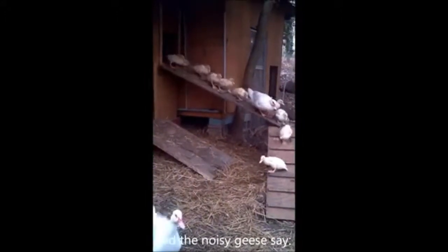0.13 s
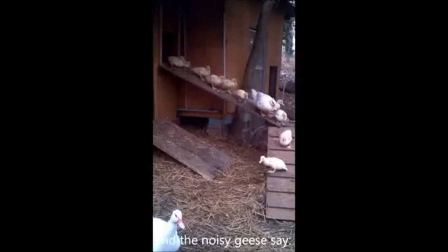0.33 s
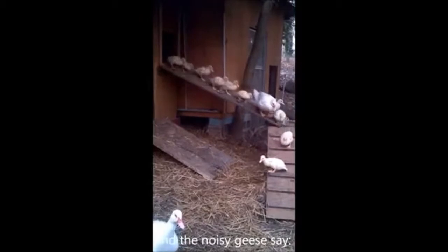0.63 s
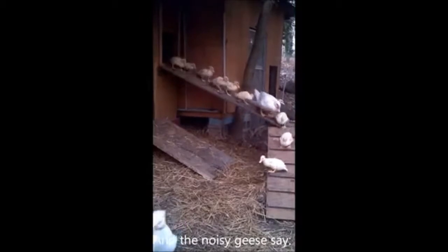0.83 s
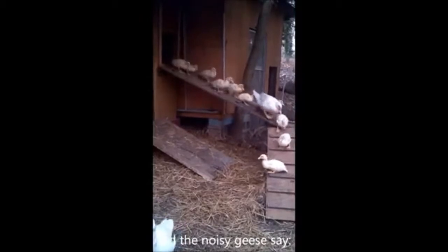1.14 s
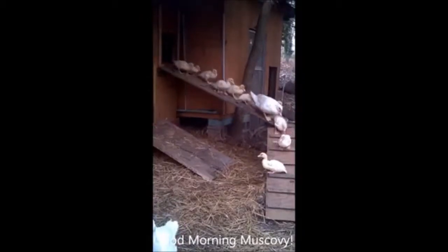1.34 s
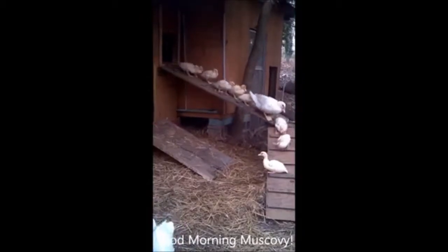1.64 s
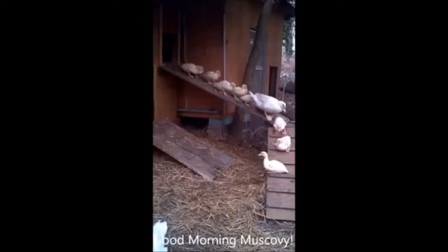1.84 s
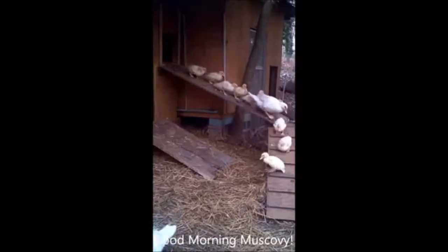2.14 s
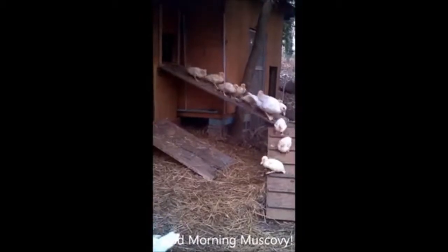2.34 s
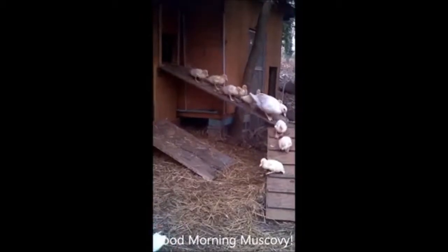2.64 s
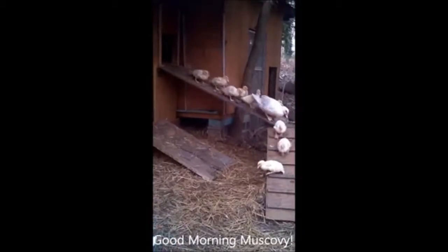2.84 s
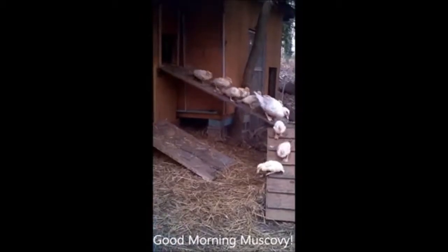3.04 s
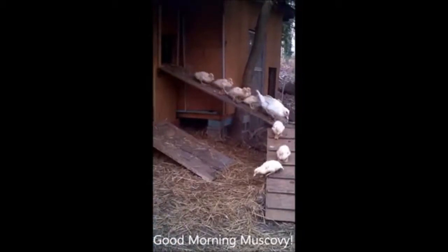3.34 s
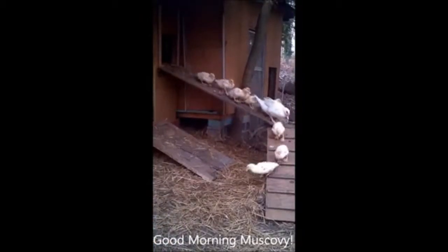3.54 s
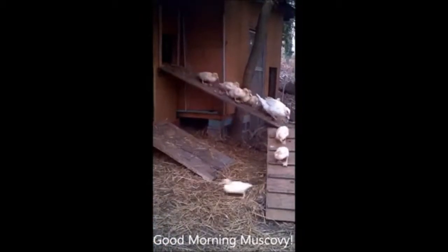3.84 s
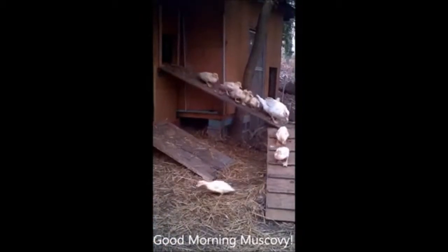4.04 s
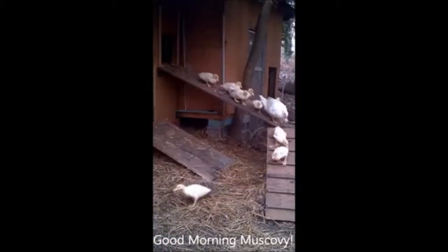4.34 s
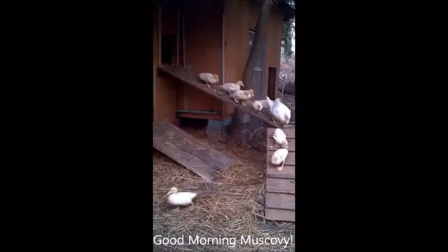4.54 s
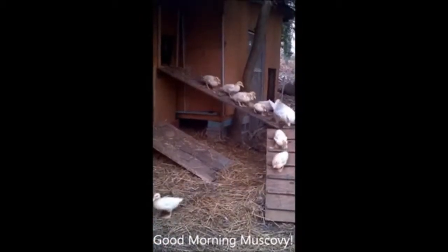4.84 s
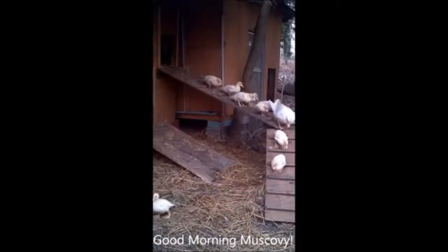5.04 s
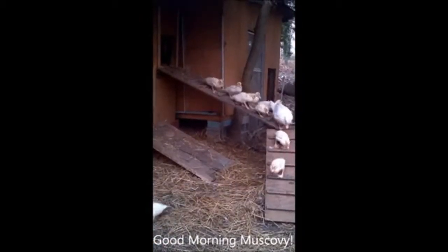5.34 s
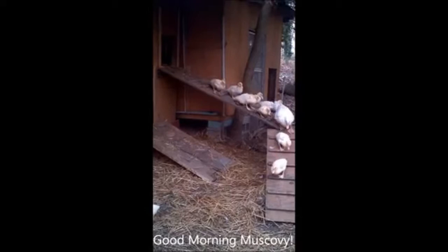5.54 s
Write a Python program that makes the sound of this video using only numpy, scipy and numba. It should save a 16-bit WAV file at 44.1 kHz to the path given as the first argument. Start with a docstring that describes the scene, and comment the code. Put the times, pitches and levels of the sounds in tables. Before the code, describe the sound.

Near geese honk hoarsely in one long blaring bout beside a wooden coop, then after a quiet lull with a distant rooster, honk again.

```python
"""Hushed yard air and a faint knock on wood come first, then geese honk in two long bouts beside a wooden coop.
Each goose is a train of membrane pulses shaped by throat, windpipe and beak; calls turn from hoarse to clear.
A second bird joins in. In the lull a far rooster's crow sinks away as two fluttering tones,
ducks cluck softly in short sliding notes, and feet rustle and snap straw in small bursts of noise."""
import sys
import numpy as np
from scipy import signal
from scipy.fft import rfft, irfft, next_fast_len
from scipy.io import wavfile
from scipy.ndimage import uniform_filter1d, map_coordinates
from numba import njit

SR = 44100
rng = np.random.default_rng(int(sys.argv[2]) if len(sys.argv) > 2 else 0)


def generate_wav(sig):
    """Save sig (samples, or channels by samples) to the path in sys.argv[1] as 16-bit PCM at SR."""
    pcm = np.round(np.clip(np.atleast_2d(sig).T, -1, 1) * 32767).astype(np.int16)
    wavfile.write(sys.argv[1], SR, pcm)


N = 250929
TIME = np.arange(N) / SR


def amp(db):
    """Turn decibels into a gain."""
    return 10 ** (np.asarray(db) / 20)


def unit(x):
    """Scale to an average (rms) level of 1."""
    return x / np.sqrt(np.mean(x ** 2) + 1e-20)


def steady(x):
    """Even out the loudness: hold the short-term rms near 1."""
    power = uniform_filter1d(uniform_filter1d(x ** 2, size=1200), size=1200)
    return x / np.sqrt(np.abs(power) + 1e-20)


def smooth(x, size=700):
    """Running mean over size samples, because nothing in a throat jumps."""
    return np.array(uniform_filter1d(np.asarray(x, float), size=size))


def gate(start, end):
    """1 from start to end, with soft edges."""
    return np.sqrt(np.abs(smooth((TIME >= start) & (TIME < end))))


def along(points, hz):
    """Read a value between (frequency, value) points on a log frequency axis."""
    f, v = np.transpose(points)
    return np.interp(np.log(hz + 1), np.log(f + 1), v)


def curves(rows):
    """One value per sample for each column after the time."""
    s, *cols = np.transpose(rows)
    return [np.interp(TIME, s, c) for c in cols]


def wobble(rate):
    """A smooth random curve with rate knots a second."""
    return map_coordinates(rng.standard_normal(int(N * rate / SR) + 4), [TIME * rate])


def filtered(x, response):
    """Multiply the spectrum of x by a complex response of frequency."""
    m = next_fast_len(N + 8192)
    return irfft(rfft(x, m) * response(np.fft.rfftfreq(m, 1 / SR)), m)[..., :N]


def keep_below(x, corner_hz, order):
    """Keep what lies below a corner frequency."""
    return filtered(x, lambda hz: 1 / (1 + (hz / corner_hz) ** order))


def keep_above(x, corner_hz, order):
    """Keep what lies above a corner frequency."""
    return filtered(x, lambda hz: 1 - 1 / (1 + (hz / corner_hz) ** order))


def coloured(x, points, size=4096):
    """Filter with the gain of (frequency [Hz], level [dB]) points, never sounding ahead of its input."""
    cepstrum = irfft(np.log(amp(along(points, np.fft.rfftfreq(size, 1 / SR)))))
    # folding the cepstrum onto its first half makes the filter causal
    cepstrum[1:size // 2] *= 2
    cepstrum[size // 2 + 1:] = 0
    return signal.oaconvolve(x, irfft(np.exp(rfft(cepstrum))))[:N]


def pair(x, lag=15 / SR):
    """Two channels: alike in the bass; higher up the right one is late (lag in s) and inverted."""
    apart = lambda hz: np.clip((hz - 1650) / 550, 0, 1)
    turn = lambda hz: apart(hz) * (2 * np.pi * hz * lag - np.pi) / 2
    sides = np.array([[1], [-1]])
    return filtered(x, lambda hz: np.exp(1j * turn(hz) * sides)) * amp([[-.3], [.3]])


# colour of the yard air: (frequency [Hz], level [dB])
AIR_COLOUR = [(25, -35), (70, -8.5), (130, -4), (500, -6), (850, -4), (1600, -7.5), (2200, -12.5),
              (3200, -19.5), (5000, -20.5), (15000, -65)]


def air(level_db=-60, rumble_db=-71):
    """Soft yard noise, over a low rumble that differs from side to side."""
    hush = amp(level_db + wobble(10.0)) * unit(coloured(rng.standard_normal(N), AIR_COLOUR))
    rumble_colour = [(25, -39.0), (60, -16.0), (130, -6.0), (400, -6.0), (1500, -64.0)]
    rumble = filtered(rng.standard_normal((2, N)), lambda hz: amp(along(rumble_colour, hz)))
    return pair(hush) + amp(rumble_db) * unit(rumble)


# colour of rubbed or snapped straw: (frequency [Hz], level [dB])
STRAW_COLOUR = [(1500, -50), (3500, -13.5), (5300, -17.5), (7500, -2.5), (9300, -2), (15000, -9.5)]
# steps in the straw: (time [s], half length [s], level [dB])
STEPS_IN_STRAW = [(2.442, 0.026, -54), (2.846, 0.15, -58.5), (3.233, 0.063, -59), (3.795, 0.057, -51),
                  (3.948, 0.029, -51.5), (4.048, 0.021, -49.5), (4.189, 0.013, -51), (4.356, 0.1, -55.5)]


def straw(stir_db=-65, grain_db=1.5):
    """Stalks rub under webbed feet in dense tiny grains: each step swells and fades over a constant stir."""
    power = amp(stir_db) ** 2
    for s, length, db in STEPS_IN_STRAW:
        swell = np.exp(-((TIME - s) / length) ** 2 / 2)
        power = power + (amp(db) * swell) ** 2
    grains = rng.standard_normal(N) * amp(grain_db * wobble(600))
    return np.sqrt(power) * unit(coloured(grains, STRAW_COLOUR))


def bursts(events, colour, t60):
    """Each contact is noise in the colour of what is struck, dying by 60 dB in t60 seconds."""
    envelope = sum(amp(db - 60 * np.abs(TIME - s) / t60) * (TIME >= s) for s, db in events)
    return envelope * unit(coloured(rng.standard_normal(N), colour))


# colour of knocked wood: (frequency [Hz], level [dB])
WOOD_COLOUR = [(200, -26), (800, -2), (1300, 4.5), (1750, 5.5), (2100, -23), (2500, -6), (4000, -70),
               (12000, -36)]
# knocks on the ramp: (time [s], level before the added gain [dB])
RAMP_KNOCKS = [(0.087, -61.5), (3.163, -46.5), (4.078, -59)]


def ramp_knocks():
    """Wood rings for about a tenth of a second after each knock."""
    return amp(6.0) * bursts(RAMP_KNOCKS, WOOD_COLOUR, t60=0.12)


# shape of the pitch arch before and after its crest
RISE_POWER, SAG_POWER = 2.05, 1.7


def arch(start, crest, end, first, top, last):
    """A value that climbs, levels out at the crest and then sags."""
    before = np.clip((crest - TIME) / (crest - start), 0, 1)
    after = np.clip((TIME - crest) / (end - crest), 0, 1)
    return top + (first - top) * before ** RISE_POWER + (last - top) * after ** SAG_POWER


# roughness from 0 (clear) towards 1 (all breath), and how fast each part comes or goes
HOARSE_ROUGH, ONSET_ROUGH, BREAK_ROUGH = .53, .3, .36
ONSET_S, CLEARING_S, BREAK_S = .1, .04, .12


def hoarseness(start, clears, clear_rough, breaking):
    """A call starts hoarse, locks into a clear tone and roughens again as it breaks off."""
    hoarse = HOARSE_ROUGH + ONSET_ROUGH * np.exp(-np.abs(TIME - start) / ONSET_S)
    locked = (1 + np.tanh((TIME - clears) / CLEARING_S)) / 2
    clear = clear_rough + BREAK_ROUGH * breaking ** 2
    return smooth(hoarse * (1 - locked) + locked * clear)


def syrinx(pitch_hz, rough, scatter=0.053, uneven_db=4, hiss=1.0, count=90):
    """Membrane pulses and their phase; roughness scatters their times and sizes and adds puffs of air."""
    phase = 2 * np.pi * np.cumsum(pitch_hz) / SR
    late = phase + 2 * np.pi * scatter * rough * wobble(130)
    # a sum of count equal harmonics makes one sharp pulse per cycle
    pulses = unit(np.sin((count + .5) * late) / (np.sin(late / 2) + 1e-12) - 1)
    pulses = pulses * amp(uneven_db * rough * wobble(90))
    puffs = unit(rng.standard_normal(N) * (1 + np.cos(phase)) ** 2)
    return np.sqrt(np.clip(1 - rough ** 2, 0, 1)) * pulses + hiss * rough * puffs, phase


# early echoes from coop wall, ground and ramp: (delay [s], level [dB])
EARLY_ECHOES = [(.0043, -16), (.0097, -14), (.0171, -15)]


def windpipe_and_walls(x, spread=4e-6):
    """The long windpipe delays higher partials (spread in s per Hz), softening pulses; the coop adds echoes."""
    def response(hz):
        echoes = 1 + sum(amp(db) * np.exp(-2j * np.pi * hz * delay) for delay, db in EARLY_ECHOES)
        return np.exp(-1j * np.pi * spread * hz ** 2) * echoes
    return filtered(x, response)


@njit
def resonance(x, centre, width):
    """A moving band-pass of gain 1; centre and width in radians a sample."""
    out, low, band = np.zeros(len(x)), 0.0, 0.0
    for i in range(len(x)):
        low += centre[i] * band
        band += width * (x[i] - band) - centre[i] * low
        out[i] = band
    return out


def ringing(x, centre_hz, width_hz):
    """What a moving resonance picks out of x."""
    return resonance(x, 2 * np.pi * centre_hz / SR, 2 * np.pi * width_hz / SR)


# colour of the voice's bright rasp: (frequency [Hz], level [dB])
RASP_COLOUR = [(1700, -22.5), (2050, -2.5), (2300, 2.5), (2770, 7), (2950, -3.5), (3250, 3.5), (3850, -1.5),
               (4600, -5.5), (5800, -12.5), (7600, -3), (11200, -16.5), (15000, -21)]
# bright upper resonance, moving with the beak's opening: (time [s], frequency [Hz])
GAPE_PATH = [(.15, 2210), (.44, 2460), (.66, 3020), (1.26, 2680), (1.58, 2810), (1.68, 2623), (2.08, 2920),
             (2.27, 2670), (4.59, 2406), (4.83, 2630), (5.5, 2722)]
GAPE_WIDTH_HZ, GAPE_GAIN, GAPE_WANDER = 217, 3.85, .07
OVERTONE_RATIO, OVERTONE_GAIN = 1.536, 0.93


def rasp(pitch_hz, rough, treble_db):
    """The membranes' sharp edge, smeared by close boards and coloured by two restless upper resonances."""
    edge = syrinx(pitch_hz, rough, scatter=.028, hiss=.5)[0] + .075 * rng.standard_normal(N)
    # three short paths change in strength as the head turns
    paths = rng.standard_normal((3, SR // 10)) * amp(-60 * TIME[:SR // 10] / 0.094)
    smeared = sum(amp(14.6 * wobble(9)) * signal.oaconvolve(edge, path)[:N] for path in paths)
    direct = .25 * unit(windpipe_and_walls(edge, spread=1e-6))
    bright = coloured(direct + steady(smeared), RASP_COLOUR)
    gape_hz, = curves(GAPE_PATH)
    peaks = 0
    for ratio, gain in [(1, GAPE_GAIN), (OVERTONE_RATIO, OVERTONE_GAIN)]:
        centre_hz = ratio * gape_hz * (1 + GAPE_WANDER * wobble(10))
        peaks = peaks + gain * ringing(bright, centre_hz, GAPE_WIDTH_HZ)
    sound = steady(bright + peaks)
    return sound + (amp(treble_db) - 1) * keep_above(sound, 6000, 12)


# throat shapes of the near geese's calls: the first goose's opening, another goose's moan, then the first
# goose's blare and both calls of its second bout: (frequency [Hz], level [dB])
OPENING_THROAT = [(300, -30), (430, -25), (600, 1), (680, -14.5), (750, -2.5), (860, 1.5), (1050, 7),
                  (1220, 8), (1370, 7.5), (1520, 10), (1680, -2.5), (1830, -4), (2050, -26)]
MOANING_THROAT = [(200, -31), (470, -32.5), (625, -16.5), (780, -1), (930, -0.5), (1100, 3.5), (1250, -4.5),
                  (1410, -16), (1570, -1.5), (1730, 5.5), (1880, -1), (2050, -70.5)]
BLARING_THROAT = [(200, -58), (450, -28.5), (600, -8.5), (760, -9.5), (910, -10.5), (1060, -5.5), (1210, 9),
                  (1360, 8), (1520, 15.5), (1670, 9), (1820, 0), (2000, -59.5)]
SECOND_BOUT_THROAT = [(200, -55.5), (450, -15.5), (600, -3), (750, -5), (900, 1.5), (1050, 4), (1200, 6),
                      (1350, 4), (1500, 10), (1650, -10), (1800, -10.5), (2050, -24)]
# loudness of the voice above the chest tone, call by call: (time [s], level [dB])
OPENING_LEVEL = [(0.156, -38), (0.178, -38.5), (0.38, -28), (0.43, -32.5), (0.684, -20), (0.71, -32),
                 (0.754, -24), (0.828, -28), (0.86, -17.5), (0.87, -27.5), (0.916, -16), (0.932, -23.5),
                 (1.13, -19.5), (1.175, -26.5)]
MOAN_LEVEL = [(1.21, -40), (1.264, -36), (1.272, -33), (1.61, -24.5)]
BLARE_LEVEL = [(1.64, -23), (1.66, -20.5), (1.684, -14.5), (1.77, -20.5), (1.8, -14), (1.94, -17),
               (2.09, -15.5), (2.15, -19.5), (2.267, -23.5), (2.3, -44.5)]
REPRISE_LEVEL = [(4.59, -40.5), (4.626, -35), (4.706, -39.5), (4.743, -30.5), (5.194, -19.5), (5.21, -19.5)]
CLOSING_LEVEL = [(5.25, -28.5), (5.374, -29), (5.464, -20.5), (5.638, -23), (5.68, -30)]
# calls, each an arch of pitch; the second, a moan, is another goose's: (start [s], crest [s], end [s], start
# pitch [Hz], crest pitch [Hz], # end pitch [Hz], time the voice clears [s], base level of rasp [dB], treble of
# rasp [dB], # fundamental relative to the chest [dB], roughness once clear [0-1])
GOOSE_CALLS = [(0.162, 0.803, 1.212, 139.9, 153.9, 150.5, 1.015, -31, 2, -23, 0.16),
               (1.183, 1.516, 1.595, 149.8, 157.8, 154.6, 1.2, -26, -3, -19.5, 0),
               (1.616, 1.8, 2.286, 152.3, 153.1, 147.9, 1.767, -30, 0, -24, 0.11),
               (4.587, 4.97, 5.23, 139.7, 150.2, 146.1, 5.02, -28, 0, -18, 0.2),
               (5.226, 5.464, 5.6, 146.9, 150, 146.8, 4.85, -26.5, 0.5, -14, 0.39)]
# bouts, in which one call runs straight into the next: (start [s], end [s])
HONKING_BOUTS = [(.163, 2.291), (4.586, 5.7)]
# resonance of the beak: (time [s], frequency [Hz], gain [times])
BEAK_PATH = [(.17, 1130, 5.9), (.35, 1330, 3), (.55, 1470, 1.9), (.7, 1496, 4.1), (.78, 1600, 13),
             (.92, 1575, 4.7), (1.1, 1537, 3.4), (1.17, 1390, 2), (1.25, 1660, 1.3), (1.58, 1730, 0.89),
             (1.68, 1372, 2.8), (1.8, 1600, 0.66), (2.1, 1540, 3.88), (2.27, 1370, 1.822),
             (4.6, 1267, 3.62), (4.95, 1440, 2.5), (5.11, 1340, 4.04), (5.2, 1440, 1.3), (5.27, 1349, 2.5),
             (5.5, 1475, 2)]
# resonance of the windpipe: (time [s], frequency [Hz], level of the chest tone [dB])
WINDPIPE_PATH = [(.17, 840, -39.5), (.35, 870, -34.5), (.48, 753, -35), (.66, 920, -35.5), (.78, 850, -38),
                 (1.1, 1020, -34.5), (1.15, 1010, -27), (1.22, 897, -31), (1.34, 990, -32),
                 (1.5, 1060, -29.5), (1.58, 960, -25.5), (1.62, 980, -31), (1.7, 910, -27),
                 (2.07, 734, -37), (2.22, 1046, -32.5), (4.6, 861.5, -40.5), (4.9, 912, -32.5),
                 (5.1, 759.8, -37.5), (5.6, 887, -34)]
BEAK_WIDTH_HZ, WINDPIPE_WIDTH_HZ, WINDPIPE_GAIN = 128, 37.5, 1.5
PITCH_WANDER, BREAK_SAG_HZ = .009, 2.5
# the rasp grows with loudness (around USUAL_DB), tension (pitch against its crest) and the break
USUAL_DB, RASP_DB_PER_DB, RASP_DB_PER_HZ, RASP_BREAK_DB = -20, 0.6567, 0.57, 5
RASP_ONSET_DB, RASP_ONSET_S = 5, 0.061  # a puff of air opens each call
RASP_LEAD_S = 0.014  # at the start of a bout, air rasps just before the voice catches


def near_geese():
    """Pulses pass the throat, focused by windpipe and opening beak, with a bright rasp on top; the moan between
    opening and blare is another goose's."""
    throats = [OPENING_THROAT, MOANING_THROAT, BLARING_THROAT, SECOND_BOUT_THROAT, SECOND_BOUT_THROAT]
    calls = np.array(GOOSE_CALLS)
    # hand over midway between one call's end and the next one's start
    current = np.searchsorted((calls[:-1, 2] + calls[1:, 0]) / 2, TIME)
    (start, crest, end, first_hz, crest_hz, last_hz, clears,
     rasp_db, treble_db, fundamental_db, clear_rough) = calls[current].T
    levels = [OPENING_LEVEL, MOAN_LEVEL, BLARE_LEVEL, REPRISE_LEVEL, CLOSING_LEVEL]
    honk_db, = curves(np.concatenate(levels))
    beak_hz, beak_gain = curves(BEAK_PATH)
    windpipe_hz, chest_db = curves(WINDPIPE_PATH)

    breaking = np.clip(1 - (end - TIME) / BREAK_S, 0, 1)
    rough = hoarseness(start, clears, clear_rough, breaking)
    arched_hz = arch(start, crest, end, first_hz, crest_hz, last_hz)
    held_hz = smooth(arched_hz - BREAK_SAG_HZ * breaking ** 2, size=1500)
    pitch_hz = held_hz * (1 + PITCH_WANDER * rough * wobble(30))

    puff_db = RASP_ONSET_DB * np.exp(-np.maximum(TIME - start, 0) / RASP_ONSET_S)
    loudness_db = RASP_DB_PER_DB * (honk_db - USUAL_DB)
    tension_db = RASP_DB_PER_HZ * (held_hz - crest_hz)
    rasp_db = smooth(rasp_db + puff_db + loudness_db + tension_db + RASP_BREAK_DB * breaking)

    def throat(x):
        echoed = windpipe_and_walls(x)
        return sum(smooth(current == k, size=1800) * coloured(echoed, shape)
                   for k, shape in enumerate(throats))

    source, phase = syrinx(pitch_hz, rough)
    throaty = throat(source)
    # the resonances lock onto the regular part of the vibration, so their partials stay clear
    regular = throat(syrinx(pitch_hz, .5 * rough ** 2, scatter=.06, hiss=.8)[0])
    voice = throaty + beak_gain * ringing(regular, beak_hz, BEAK_WIDTH_HZ)
    upper = steady(voice - keep_below(voice, 1150, 24))
    chest = throaty + WINDPIPE_GAIN * ringing(regular, windpipe_hz, WINDPIPE_WIDTH_HZ)
    chest = keep_above(keep_below(chest, 1150, 24), 220, 6)
    fundamental = amp(smooth(fundamental_db)) * np.sin(phase)
    body = amp(chest_db) * (steady(chest) + fundamental) + amp(honk_db) * upper

    # a hoarse voice sputters
    sputter = amp(1.9 * rough * wobble(60))
    voiced = sum(gate(first, last) for first, last in HONKING_BOUTS)
    rasping = sum(gate(first - RASP_LEAD_S, last) for first, last in HONKING_BOUTS)
    edge = amp(rasp_db) * rasp(pitch_hz, rough, smooth(treble_db))
    return sputter * (voiced * body + rasping * edge)


COOP_T60_S, COOP_DB = .35, -11


def coop(x):
    """The boards scatter the rasp into a short bright tail, different on each side."""
    tails = rng.standard_normal((2, SR // 2)) * amp(-60 * TIME[:SR // 2] / COOP_T60_S)
    bright = keep_above(x, 2200, 12)
    sides = [signal.fftconvolve(bright, tail / np.linalg.norm(tail))[:N] for tail in tails]
    return amp(COOP_DB) * np.array(sides)


# how long the yard rings: (frequency [Hz], time to die by 60 dB [s])
YARD_DECAY = [(200, 0.95), (1500, 0.8), (3000, 0.75), (12000, 0.039)]


def yard(x):
    """A faint tail from the walls and trees; the treble dies first."""
    hz, t, z = signal.stft(rng.standard_normal(SR), SR, nperseg=256)
    fading = z * amp(-60 * t / along(YARD_DECAY, hz)[:, None])
    tail = signal.istft(fading, SR, nperseg=256)[1]
    return signal.fftconvolve(x, tail / np.linalg.norm(tail))[:N]


def second_goose(call, throat, rough, fundamental_db):
    """A voice with its own arch of pitch, loudest at the crest."""
    start, crest, end, first_hz, crest_hz, last_hz, db, swell_db = call
    source, phase = syrinx(arch(start, crest, end, first_hz, crest_hz, last_hz), rough)
    envelope = gate(start, end) * amp(db + arch(start, crest, end, -swell_db, 0, -swell_db))
    shaped = unit(coloured(windpipe_and_walls(source), throat))
    return envelope * (shaped + amp(fundamental_db) * np.sin(phase))


# throat shapes as the second goose joins in, then answers: (frequency [Hz], level [dB])
JOINING_THROAT = [(200, -81), (600, -26.5), (790, 2.5), (1000, -12.5), (1550, -8.5), (2100, -24.5),
                  (2800, -17), (4500, -21.5), (5600, -45.5), (7700, -16), (11000, -27), (15000, -52)]
ANSWERING_THROAT = [(200, -27.5), (400, -40.5), (520, -14), (690, -4.5), (860, 2.5), (1040, 10.5),
                    (1200, -3), (1380, 4.5), (1550, -2), (2060, -7), (3500, -65.5), (9000, -50)]
# calls of the second goose: (start [s], crest [s], end [s], start pitch [Hz], crest pitch [Hz],
# end pitch [Hz], level [dB], swell [dB])
SECOND_GOOSE_CALLS = [(0.55, 0.662, 0.76, 156.8, 158.4, 161, -35, 17),
                      (0.83, 0.875, 0.897, 156, 159, 158, -27, 14),
                      (5.21, 5.565, 5.8, 162.8, 173.5, 168.5, -26, 6.5)]
# the moan runs on under the blare and beats with it (same columns)
MOAN_RUNNING_ON = (1.63, 1.86, 1.94, 157, 156.6, 156.2, -28.5, 5)


def overlapping_calls():
    """Higher calls of a second goose beat against the first; another goose's moan runs on under the blare."""
    *joining, answer = SECOND_GOOSE_CALLS
    out = sum(second_goose(call, JOINING_THROAT, rough=.35, fundamental_db=-32) for call in joining)
    out += second_goose(answer, ANSWERING_THROAT, rough=.3, fundamental_db=-20)
    return out + second_goose(MOAN_RUNNING_ON, MOANING_THROAT, rough=.1, fundamental_db=-26)


CROW_START_S = 2.3
CROW_END_HZ, CROW_SAG_HZ, CROW_SAG_S = 1700, 125, 0.8  # of the strong second harmonic
# level of the crow's second harmonic, throbbing around 3 s: (time [s], level [dB])
CROW_LEVEL = [(2.3, -52), (2.87, -54), (2.905, -40.5), (2.935, -43), (2.955, -51), (2.98, -47.5),
              (3.01, -58), (3.04, -44), (3.07, -60), (3.1, -44), (3.135, -54), (3.5, -51.5), (3.6, -62.5),
              (4.4, -81)]


def rooster(fundamental_db=-52, thinning_db_per_s=10, waver=0.011):
    """A far crow of two fluttering partials that sink as the note is held."""
    t = np.maximum(TIME - CROW_START_S, 0)
    second_hz = CROW_END_HZ + CROW_SAG_HZ * np.exp(-(t / CROW_SAG_S) ** 2)
    db, = curves(CROW_LEVEL)
    # half the second harmonic's phase is the fundamental's
    phase = np.pi * np.cumsum(second_hz * (1 + waver * wobble(110))) / SR
    second = np.sin(2 * phase) * amp(db + 2.4 * wobble(85))
    fundamental = np.sin(phase) * amp(fundamental_db - thinning_db_per_s * t + 4 * wobble(55))
    return gate(CROW_START_S, np.inf) * (second + fundamental)


# soft duck clucks: (time [s], pitch [Hz], upward slide [octaves per s], level [dB])
DUCK_CLUCKS = [(2.64, 733, 4.8, -50.5), (2.93, 711, 5, -48.5), (4.278, 900, 27, -56)]


def clucks(length=.03, rough=.05):
    """Ducks' short, soft notes slide upward with a shaky pitch."""
    out = np.zeros(N)
    for s, hz, slide, db in DUCK_CLUCKS:
        t = np.clip(TIME - s, -.15, .15)
        pitch_hz = hz * 2 ** (slide * t) * (1 + rough * wobble(200))
        tone = np.sin(2 * np.pi * np.cumsum(pitch_hz) / SR)
        out += amp(db) * np.exp(-(t / length) ** 2) * tone
    return out


# snapping stalks: (time [s], level before the added gain [dB])
STALK_SNAPS = [(3.3902, -44.5), (3.7948, -40.5), (4.025, -41), (4.0494, -39), (4.195, -45.5), (4.354, -41),
               (4.3638, -41)]


def snapping_stalks():
    """A stalk gives way in a crack a few milliseconds long."""
    return amp(5) * bursts(STALK_SNAPS, STRAW_COLOUR, t60=0.004)


def scene():
    """Geese in front, small farm sounds behind."""
    geese = near_geese() + overlapping_calls()
    small = straw() + ramp_knocks() + rooster() + clucks() + snapping_stalks()
    # low notes spread all round the yard and come back from both sides
    spread_colour = [(170, -3), (300, -1), (700, -10), (1400, -23.0), (2600, -41.5)]
    both_sides = np.array([yard(geese), yard(geese)])
    diffuse = filtered(both_sides, lambda hz: amp(along(spread_colour, hz)))
    front = pair(geese + small + amp(-23) * yard(geese))
    return front + coop(geese) + diffuse + air()


TOP_HZ = 15050


def record(dry):
    """The phone thins the deepest bass and keeps nothing above its band limit."""
    return filtered(dry, lambda hz: (hz < TOP_HZ) * hz / np.hypot(hz, 70))


dry = scene()
out = record(dry)
generate_wav(out)
```